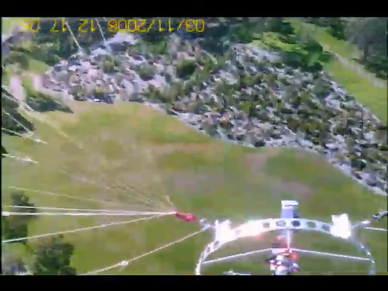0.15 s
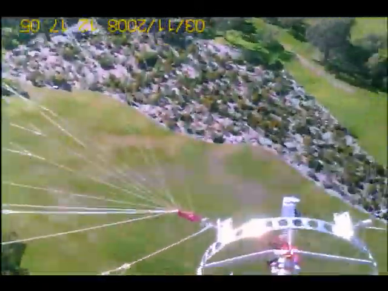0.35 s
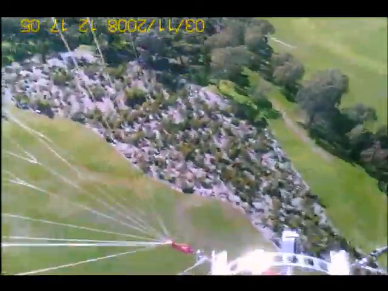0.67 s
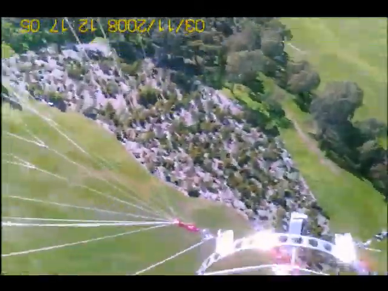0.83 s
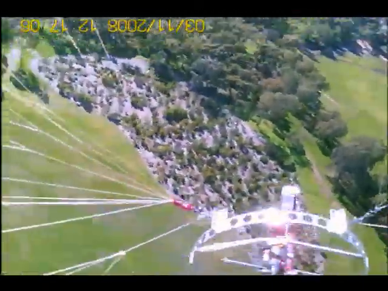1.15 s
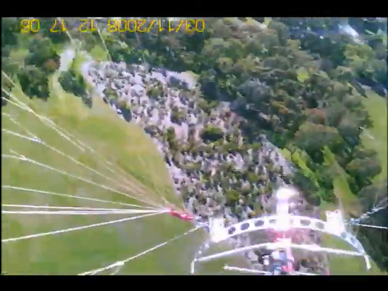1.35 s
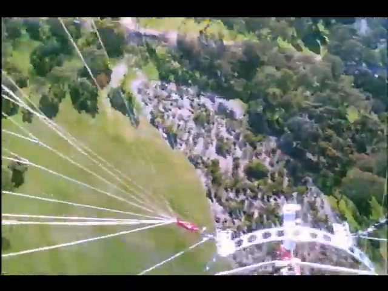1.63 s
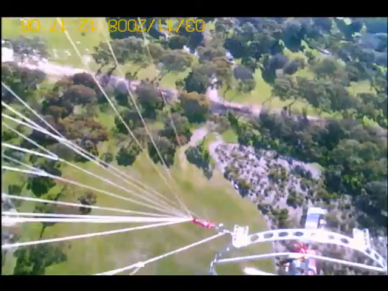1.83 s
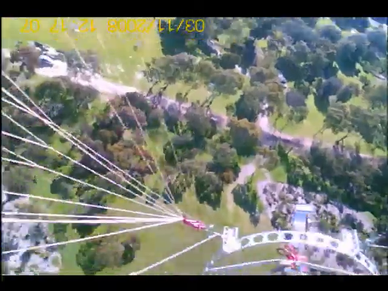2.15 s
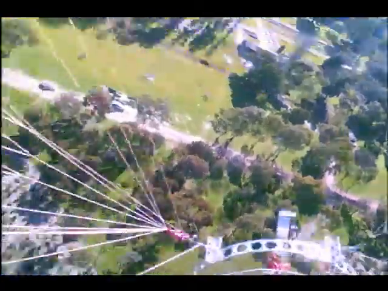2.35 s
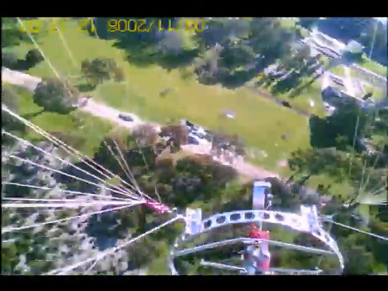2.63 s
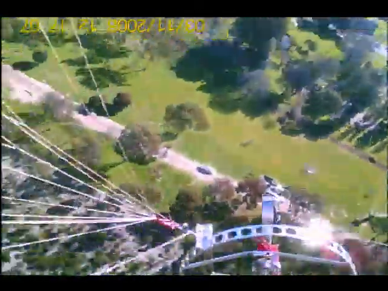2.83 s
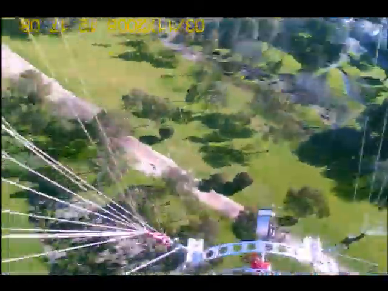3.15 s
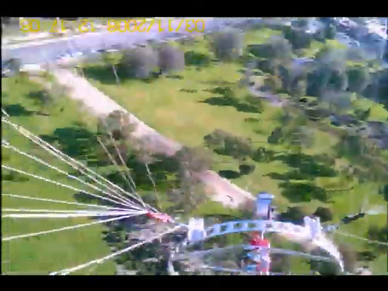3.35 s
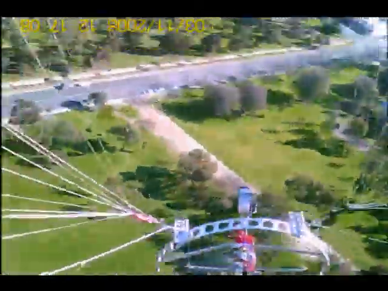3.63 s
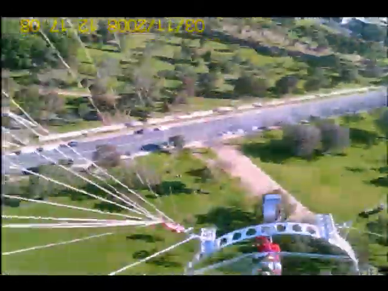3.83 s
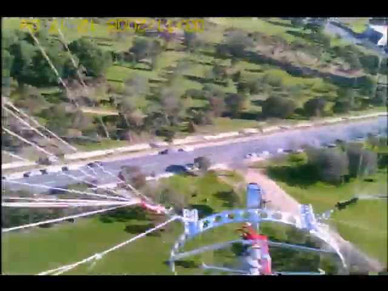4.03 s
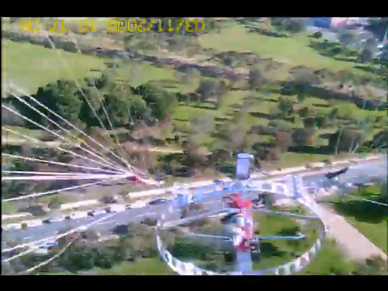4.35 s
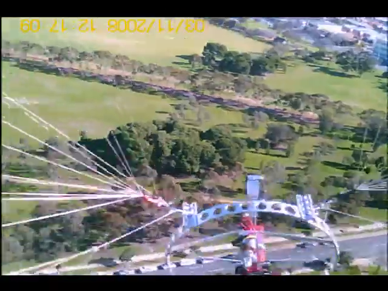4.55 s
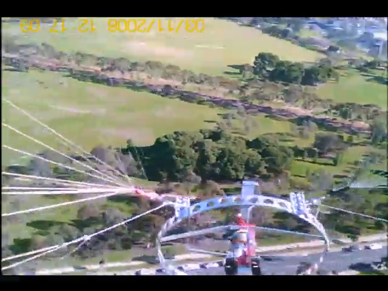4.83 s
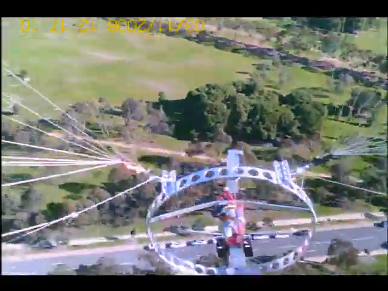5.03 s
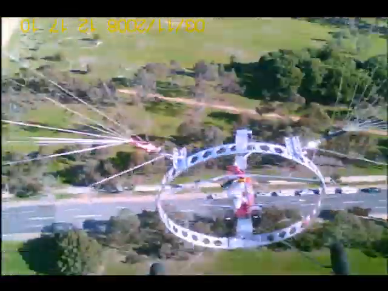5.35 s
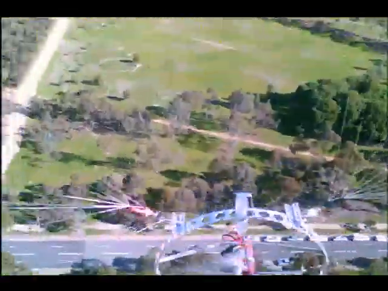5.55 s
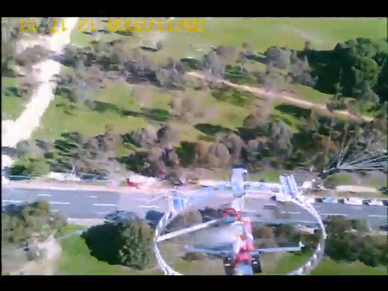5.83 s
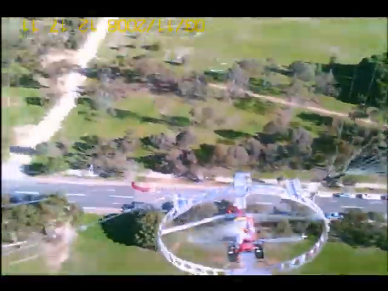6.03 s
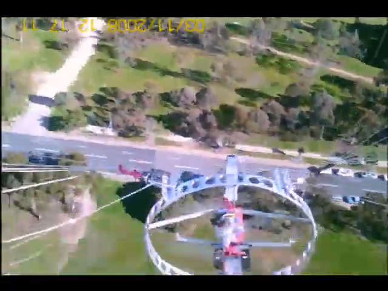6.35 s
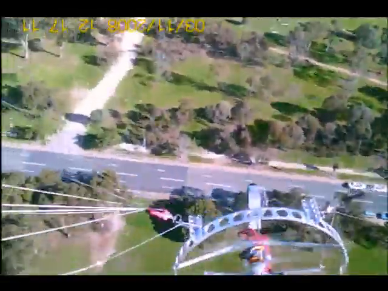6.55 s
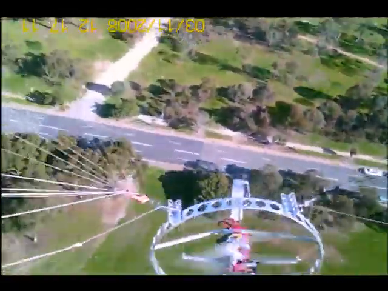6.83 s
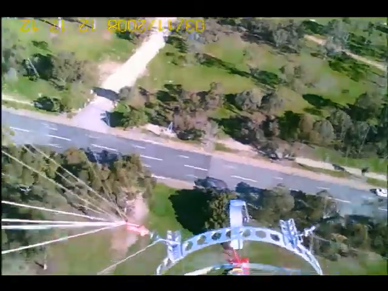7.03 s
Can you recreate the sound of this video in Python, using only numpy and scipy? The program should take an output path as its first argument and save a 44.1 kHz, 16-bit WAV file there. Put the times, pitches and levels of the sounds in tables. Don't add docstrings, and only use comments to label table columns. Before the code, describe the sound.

A small two-blade propeller drones without pause close to the microphone, hard, buzzy and ringing, its pitch almost fixed. Rapid blade cracks fuse into a rough tone with fine pulsing hiss. Its brightness and loudness shift gently as it sways. Outdoors in flight, strong wind rumbles, flutters and pops on the exposed microphone, easing a little around five seconds and then building again.

```python
import sys
import numpy as np
from scipy import signal
from scipy.fft import rfft, irfft, next_fast_len
from scipy.io import wavfile
from scipy.ndimage import uniform_filter1d

SR = 44100
rng = np.random.default_rng(int(sys.argv[2]) if len(sys.argv) > 2 else 0)


def inscribe(sig):
    pcm = np.round(np.clip(np.atleast_2d(sig).T, -1, 1) * 32767)
    wavfile.write(sys.argv[1], SR, pcm.astype(np.int16))


def gain_from_decibels(decibels):
    exponent = np.asarray(decibels, float) / 20
    return 10 ** exponent


N = 317079

# f/Hz, level/dB in each 140 Hz
FLUTTER = [(40, -13.5), (120, 1.5), (250, -1.5), (500, -5), (750, -12.5), (1000, -18.5), (1500, -26.5),
           (2500, -53.5)]


def propeller():
    # t/s, speed/rpm
    shaft = [(0.0, 8430), (0.5, 8434), (0.9, 8443), (1.4, 8444), (1.63, 8437), (2.1, 8447), (4.1, 8453),
             (4.4, 8449), (5.3, 8443), (5.9, 8442), (6.4, 8453), (7.19, 8453)]
    # t/s, level/dB
    facing = [(0.0, -4), (0.2, -2), (0.5, -4), (0.72, 1), (1.05, 0), (1.5, -3.5), (2.4, 1.5), (2.56, -1),
              (2.72, -3.3), (3.06, -1), (3.24, 3), (3.42, -5), (3.74, -5.5), (4.42, 0.5), (5.98, -0.5),
              (6.36, 1.5), (6.8, -3), (7.19, -4)]
    # t/s, level/dB
    hang = [
        (0.0, -1.5),
        (0.25, -1.5),
        (0.55, 1.5),
        (1.1, 1.5),
        (1.4, 0.2),
        (1.8, 2.2),
        (4.1, 2),
        (4.6, -0.9),
        (6.1, -1.4),
        (7.19, -.2),
    ]
    ring_per_facing = (-.05, .05, 0.54, 1)
    ring_per_hang = (-0.24, 0.65, .3, .05)

    facing_db, hang_db = curve(facing), curve(hang)
    rings_db = [a * facing_db + b * hang_db for a, b in zip(ring_per_facing, ring_per_hang)]
    speed_rpm = curve(shaft) + 1.6 * wander(hz=12)
    turns = np.cumsum(speed_rpm) / 60 / SR

    which = np.floor(2 * turns + 0.3).astype(int)
    late, strong = rng.standard_normal((which[-1] + 1, 2))[which].T
    late, strong = uniform_filter1d(late, size=40), uniform_filter1d(strong, size=40)

    hum_wave, *ring_waves = one_turn()
    crack = blade_cracks(turns + 0.0004 * late, ring_waves, rings_db)
    hum = play_turns(turns + 0.012 * wander(hz=11), hum_wave) * gain_from_decibels(1.8 * wander(hz=2.5))
    hiss = blade_hiss(2 * turns, facing_db, rings_db[-1], strong)
    return hum + crack * gain_from_decibels(0.66 * strong) + hiss


def blade_cracks(turns, ring_waves, rings_db):
    crack = sum(gain_from_decibels(db) * play_turns(turns, wave) for db, wave in zip(rings_db, ring_waves))
    t = np.arange(N) / SR
    delay_s = 0.0011 + 0.00012 * wander(hz=0.35)
    return crack + gain_from_decibels(-17) * np.interp(t - delay_s, t, crack)


def blade_hiss(passes, facing_db, top_ring_db, strong):
    # f/Hz, level/dB in each 140 Hz
    tip_spectrum = [(800, -70), (1500, -63), (2800, -72.5), (3700, -62), (5000, -65.5), (6400, -59.5),
                    (7500, -64), (8300, -48.5), (9200, -60), (10200, -91), (11000, -100)]
    # f/Hz, level/dB in each 140 Hz
    guard_spectrum = [(800, -68), (1600, -49.5), (2800, -60.5), (3600, -51), (4400, -52), (6400, -65),
                      (7500, -70), (8300, -52.5), (9200, -66), (10200, -89), (11000, -100)]
    # f/Hz, level/dB in each 140 Hz
    wash_spectrum = [(800, -62), (1500, -51), (2100, -48.5), (2850, -68.5), (3600, -49), (5000, -59),
                     (6400, -62.5), (8300, -56), (9200, -59), (10200, -70), (11000, -100)]

    tips = noise(tip_spectrum) * evened(puff(passes, 0.03, 0.098))
    tips *= gain_from_decibels(0.16 * top_ring_db + 1.3 * strong)
    guard = noise(guard_spectrum) * evened(puff(passes, 0.606, 0.11))
    guard *= gain_from_decibels(0.11 * facing_db + 1.2 * wander(hz=25.6))
    wash = noise(wash_spectrum) * gain_from_decibels(1.1 * wander(hz=11))
    return tips + guard + wash


def puff(passes, at, width):
    return np.exp((np.cos(2 * np.pi * (passes - at)) - 1) / (2 * np.pi * width) ** 2)


def one_turn(size=4096):
    # shaft order, level/dB rms
    blade_pass = [(2, -35.5), (4, -39.5), (6, -53), (8, -37.5), (10, -38), (12, -36.5), (14, -34.5),
                  (16, -42), (18, -45), (20, -45.5), (22, -48), (24, -41), (26, -38), (28, -40),
                  (30, -40.5), (32, -51), (34, -47.5), (36, -44.5), (38, -43.5), (40, -46.5), (42, -48),
                  (44, -58), (46, -57), (48, -55.5), (50, -51.5), (52, -53), (54, -51), (56, -56),
                  (58, -45), (60, -44), (62, -52), (64, -64), (66, -61), (68, -60), (70, -64.5), (72, -77),
                  (74, -74.5)]
    # odd shaft order, level/dB rms
    blade_mismatch = [(1, -33.5), (3, -56), (7, -63.5), (13, -60.5), (17, -68), (21, -64.5), (25, -52.5),
                      (31, -56.5), (39, -66), (49, -83), (55, -65.5), (59, -49.5), (65, -53.5), (73, -75.5)]
    ring_orders = (8, 21, 33, 51)

    order = np.arange(129)
    both, differ = (causal(np.interp(order, *np.transpose(table), right=-95))
                    for table in (blade_pass, blade_mismatch))
    lines = np.where(order % 2, differ, -1j * both) * (order > 0) * size / np.sqrt(2)
    ring = np.searchsorted(ring_orders, order, side="right")
    return [irfft(lines * (ring == k), size) for k in range(len(ring_orders) + 1)]


def causal(db):
    log_gain = np.log(gain_from_decibels(db))
    circle = np.r_[log_gain, log_gain[-2:0:-1]]
    return np.exp(log_gain - 1j * signal.hilbert(circle).imag[:len(db)])


def play_turns(turns, wave):
    return np.interp(turns % 1, np.arange(len(wave)) / len(wave), wave, period=1)


def wind():
    # t/s, level/dB
    airstream = [(0.0, -21.5), (0.06, -19.5), (1.1, -20), (1.5, -19), (2.3, -19), (3.3, -18.5), (3.6, -20),
                 (3.9, -19), (4.3, -19.5), (4.7, -24), (5.4, -25), (5.85, -20), (6.2, -21.5), (6.5, -19),
                 (7.19, -21)]
    # t/s, level/dB, length/s
    gusts = [(0.098, 3, 0.071), (0.357, -0.5, 0.043), (0.526, 4, .04), (0.707, 2.5, .08), (1.387, 2, 0.052),
             (1.507, 5.5, 0.033), (1.65, -5.5, .04), (1.683, 4, 0.046), (1.747, 2, 0.033), (2.206, 4, .1),
             (2.352, -3, .05), (2.44, -5, 0.028), (2.706, -10, .05), (2.733, 6, 0.084), (2.995, -3, 0.081),
             (3.174, 3.5, 0.13), (3.33, 2.5, 0.068), (3.643, -3, 0.077), (3.93, 5, .08), (4.0, -12, .04),
             (4.167, 4.5, 0.086), (4.794, 0, .04), (4.977, 3.5, 0.18), (5.13, -10, 0.045),
             (6.14, -11, 0.047), (6.38, -2, 0.052), (6.505, 3, 0.036), (6.813, -0.5, 0.046), (6.92, 2, .04),
             (7.092, 2.5, 0.11)]
    # f/Hz, level/dB in each 140 Hz
    rumble_spectrum = [(2, -32), (6, 1), (20, 2), (60, -3), (110, -9.5), (200, -20.5), (400, -61)]

    t = np.arange(N) / SR
    stream_db = curve(airstream)
    stream_db = stream_db + sum(db * np.exp(-((t - s) / (0.54 * length)) ** 2) for s, db, length in gusts)
    push = sum(gain_from_decibels(db - 16.5) * (db > 0) * np.exp(-((t - s) / 0.014) ** 2) for s, db, _ in gusts)

    lumps = wander(hz=35.8)
    swell = evened(noise(rumble_spectrum) * gain_from_decibels(1.2 * lumps))
    flutter = eddy_flutter(lumps, swell) * gain_from_decibels(stream_db - 9)
    bursts = (eddy_pops() + eddy_ticks(stream_db)) * (0.36 + evened(noise(FLUTTER)))
    air = swell * gain_from_decibels(stream_db + 0.85) + push + flutter + bursts
    swing_top = 0.9
    return swing_top * np.tanh((air - air.mean()) / swing_top)


def eddy_flutter(lumps, swell):
    shed_hz, shed_width_hz = 21.1, 3.5
    shedding = evened(shaped(lambda f: np.exp(-((f - shed_hz) / shed_width_hz) ** 2)))
    lump_db = 2.8 * lumps + 3.5 * wander(hz=89.4) + 2.5 * swell + 2.5 * shedding
    return evened(noise(FLUTTER) * gain_from_decibels(np.minimum(lump_db, 10)))


def eddy_pops():
    # t/s, peak level/dB
    burst_times = [(0.046, -25), (0.078, -16), (0.263, -13.5), (0.532, -11), (0.722, -18), (0.796, -13),
                   (1.114, -23), (1.365, -12), (1.487, -22), (1.612, -16.5), (1.687, -11), (1.76, -11),
                   (1.885, -20), (2.192, -18), (2.627, -10), (2.718, -11.5), (2.948, -10), (3.044, -12),
                   (3.338, -13), (3.914, -27), (4.053, -13.5), (4.142, -14), (4.357, -11.5), (4.783, -12.5),
                   (5.023, -19), (5.26, -21), (6.256, -16), (6.37, -12), (6.841, -13), (7.058, -17)]
    t, pops = np.arange(1300) / SR, np.zeros(N)
    rise_s, decay_s = 0.0018, 0.0037
    shape = (1 - np.exp(-t / rise_s)) * np.exp(-t / decay_s)
    for s, db in burst_times:
        part = pops[round(s * SR):][:len(t)]
        part += gain_from_decibels(db + 3) * shape[:len(part)]
    return pops


def eddy_ticks(stream_db):
    hits = rng.random(N) < 70 / SR
    ticks = hits * gain_from_decibels(stream_db - 7.5 + 3.1 * rng.standard_normal(N))
    t = np.arange(1300) / SR
    return signal.oaconvolve(ticks, np.exp(-((t - 0.004) / 0.0016) ** 2))[:N]


def shaped(gain):
    size = next_fast_len(N)
    spectrum = rfft(rng.standard_normal(size))
    return irfft(spectrum * gain(np.fft.rfftfreq(size, 1 / SR)), size)[:N]


def noise(points):
    f, db = np.transpose(points)
    hiss = shaped(lambda hz: gain_from_decibels(np.interp(np.log(hz + 1), np.log(f + 1), db)))
    return hiss * np.sqrt(SR / 2 / 140)


def wander(hz):
    return evened(shaped(lambda f: (f > 0) / (1 + (f / hz) ** 4)))


def evened(x):
    return x / np.sqrt(np.mean(x ** 2) + 1e-20)


def curve(rows):
    return np.interp(np.arange(N) / SR, *np.transpose(rows))


def camera_rounding(x, step_db, flicker_db, mute_db, size=1152):
    n, k = np.arange(2 * size)[:, None] + 0.5, np.arange(size // 2) + 0.5
    window = np.sin(np.pi * n / (2 * size))
    basis = window * np.cos(np.pi / size * (n + size / 2) * k) * np.sqrt(2 / size)
    count = len(x) // size + 2
    padded = np.pad(x, (size, (count + 1) * size - len(x)))
    lines = np.lib.stride_tricks.sliding_window_view(padded, 2 * size)[::size][:count] @ basis

    step = gain_from_decibels(step_db + flicker_db * rng.standard_normal((count, size // 32))).repeat(16, axis=1)
    rounded = np.floor((abs(lines) / step) ** 0.75 + 0.4054) ** (4 / 3) * step * np.sign(lines)

    power = uniform_filter1d((lines ** 2).reshape(count, -1, 6).mean(2), size=3, axis=0)
    khz = np.arange(size // 12) * 3 * SR / size / 1000
    drift = uniform_filter1d(rng.standard_normal(power.shape), size=5, axis=0)
    limit_db = mute_db - 1.05 * khz + 3.5 * drift
    rounded *= ((power > gain_from_decibels(limit_db) ** 2) | (khz > 9)).repeat(6, axis=1)

    frames = rounded @ basis.T
    return (frames[1:, :size] + frames[:-1, size:]).ravel()[:len(x)]


def scene():
    return (propeller() + wind())[None]


def roll_off(x):
    return signal.sosfilt(signal.butter(12, 11000, fs=SR, output="sos"), x)


def record(dry):
    low = signal.oaconvolve(dry[0], signal.firwin(511, 10900, fs=SR), "same")
    rounded = camera_rounding(low, step_db=-41, flicker_db=2.5, mute_db=-32)
    offset = -0.061
    fade_in = np.minimum(np.arange(N) / 200, 1)
    return roll_off((rounded[None] + offset) * fade_in)


dry = scene()
out = record(dry)
inscribe(out)
```